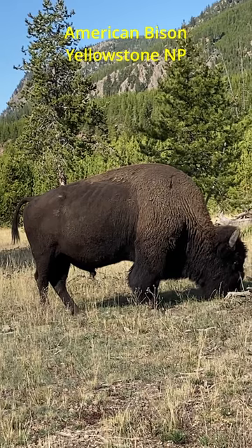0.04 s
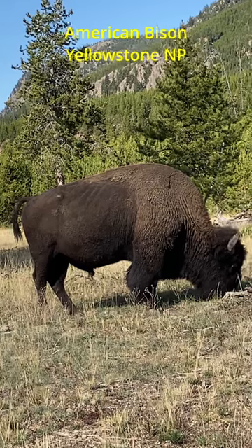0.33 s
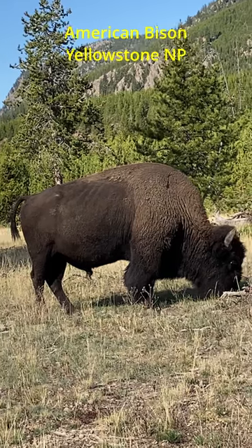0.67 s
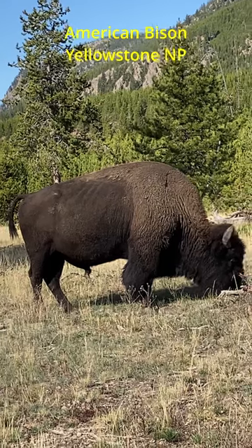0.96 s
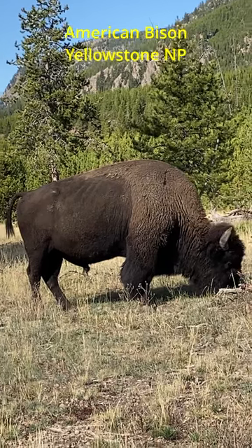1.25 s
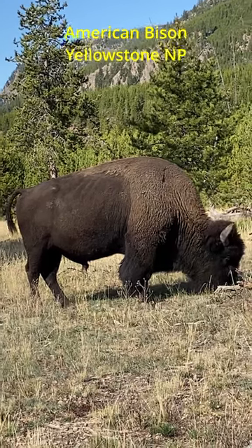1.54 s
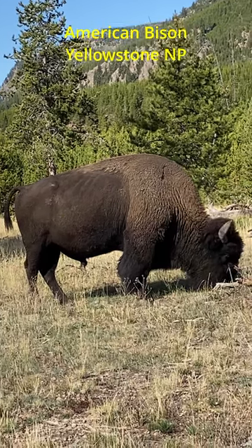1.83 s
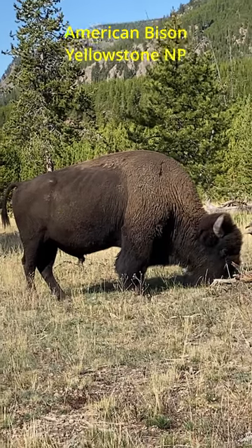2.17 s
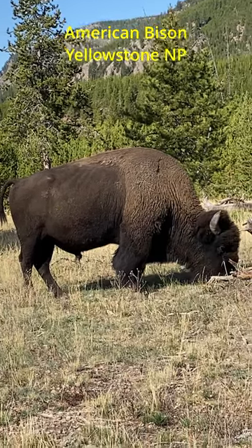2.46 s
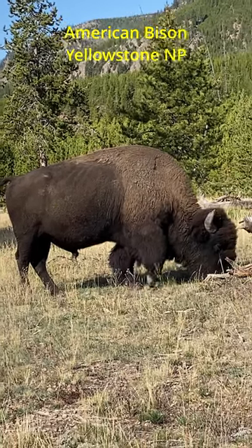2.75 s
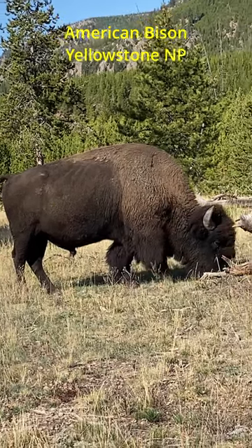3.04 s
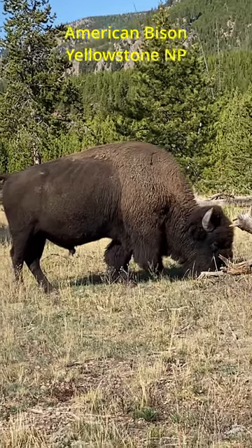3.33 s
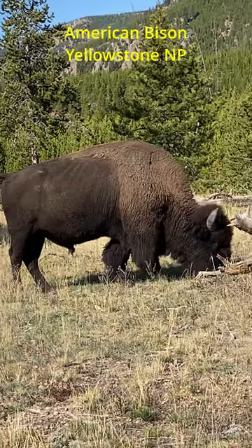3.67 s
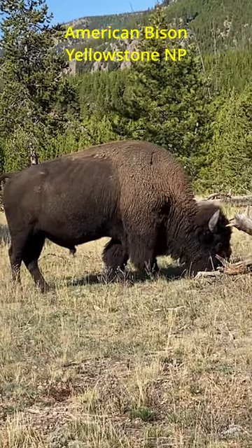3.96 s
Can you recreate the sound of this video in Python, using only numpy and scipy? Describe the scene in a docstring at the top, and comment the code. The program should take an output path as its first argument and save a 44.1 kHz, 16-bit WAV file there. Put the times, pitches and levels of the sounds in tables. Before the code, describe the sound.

A passing vehicle's low rumble and tyre roar carry across an open field over faint hiss. The tyres brighten slightly and fade, a deeper engine briefly swells near the end, and dry grass rustles faintly near the microphone.

```python
"""A vehicle passes out of sight beyond a dry meadow. From the start its engine drones over a low hum
that throbs as two tones beat; faint hiss hangs above, and a very faint, fast ticking, likely a camera's,
sounds close by. A few soft bumps of air strike the microphone, the first within the opening second.
The tyres' roar, broad noise with a gliding tread resonance, brightens a little and then recedes.
Near three seconds a deeper engine revs briefly, and the sparse rustles of dry grass come more often."""
import sys
import numpy as np
from scipy import signal
from scipy.fft import rfft, irfft
from scipy.io import wavfile

SR = 44100
rng = np.random.default_rng(int(sys.argv[2]) if len(sys.argv) > 2 else 0)


def digitize_waveform(pressure):
    """Quantize a signal to 16-bit integers and store it at the path in sys.argv[1].

    Rows of a 2-D input are taken as channels; values are limited to [-1, 1].
    """
    field = np.atleast_2d(pressure).T
    bounded = np.clip(field, -1, 1)
    quanta = np.round(bounded * 32767).astype(np.int16)
    wavfile.write(sys.argv[1], SR, quanta)


N = 176400
TIME = np.arange(N) / SR
FREQS = np.maximum(np.fft.rfftfreq(N, 1 / SR), 1)

# The exhaust's strongest tone. Each row: time in seconds, frequency in Hz, level in dB.
EXHAUST_TONE = [(0, 97, -65), (.39, 94.2, -51.5), (.65, 93.6, -52), (.76, 93.75, -49.5),
                (1.1, 93.34, -52.5), (1.3, 93.6, -54.5), (1.5, 93.8, -56.5), (1.78, 93.5, -52),
                (2.05, 93.8, -59.5), (2.47, 93.1, -53.5), (2.66, 94.14, -61.5), (3.3, 94.9, -59.5),
                (4, 94.8, -60)]
# Two upper drones. Each row: time in seconds, then frequency in Hz and level in dB
# for the lower drone, then the same for the upper.
ENGINE_DRONES = [(0, 160, -64.5, 275.9, -67.5), (.7, 162, -67, 277.8, -65.5),
                 (1.6, 158.5, -66.5, 282.9, -67.5), (2.4, 163, -65, 281, -69.5),
                 (2.9, 161.5, -62, 277.6, -71.5), (3.3, 158, -66, 278.7, -70), (4, 161, -63.5, 279.5, -70)]
# The rumble's spectrum. Each row: frequency in Hz, relative density in dB.
RUMBLE_SPECTRUM = [(10, -29.5), (20, -6), (45, 1.5), (70, -1.5), (95, 0.5), (125, 0), (200, -2.5),
                   (260, -6.5), (350, -8.5), (410, -22), (700, -18), (3000, -74)]
# The rumble's course. Each row: time in seconds, level in dB.
RUMBLE_LEVELS = [(0, -53.5), (.8, -53.5), (1.15, -54), (1.7, -56.5), (2.4, -54.5), (3, -55.5), (3.5, -55.5),
                 (4, -57.5)]
def engine():
    """Periodic firing gives a line spectrum: an exhaust tone and two drones stand over a noisy rumble."""
    hz, db = in_time(EXHAUST_TONE)
    lower_hz, lower_db, upper_hz, upper_db = in_time(ENGINE_DRONES)
    return (from_db(db) * tone(hz, waver=0.26)
            + from_db(lower_db) * tone(lower_hz, waver=0.48)
            + from_db(upper_db) * tone(upper_hz, waver=0.48)
            + wash(RUMBLE_SPECTRUM, in_time(RUMBLE_LEVELS)[0], flutter_db=0.66, flutter_hz=10))


# Faint hums of steady pitch. Each row: frequency in Hz, relative level in dB, waver depth from 0 to 1.
STEADY_HUMS = [(32.4, -69.5, 0), (41.3, -74, 0.9), (79.6, -66.5, 0.7)]
# The swell of all the hums together. Each row: time in seconds, gain in dB.
HUM_SWELL = [(0, -1.5), (.5, 1), (1, 3), (1.55, 0.5), (2.3, -1), (3, 1.5), (4, -2.5)]
THROB_HZ, THROB_DB, PARTNER_DB = 60, -58, -2.5
BEAT_HZ, IN_PHASE_S = 2.94, 0.175
def hums():
    """Beating: two close tones throb at their difference frequency, among fainter steady hums."""
    beat = 1 + from_db(PARTNER_DB) * np.exp(2j * np.pi * BEAT_HZ * (TIME - IN_PHASE_S))
    throb = from_db(THROB_DB) * np.real(signal.hilbert(tone(THROB_HZ, waver=0.25)) * beat)
    steady = sum(from_db(db) * tone(hz, waver) for hz, db, waver in STEADY_HUMS)
    return (throb + steady) * from_db(in_time(HUM_SWELL)[0])


# Road noise. Each row: time in seconds, relative levels in dB of the roar, its upper edge and its body.
ROAD_LEVELS = [(0.08, -50.5, -57.5, -58), (0.29, -52.5, -62, -60.5), (.8, -55, -60.5, -62.5),
               (1.12, -57, -59.5, -61.5), (1.6, -58, -59.5, -63.5), (1.97, -58.5, -61.5, -64.5),
               (2.12, -62, -57.5, -64.5), (2.25, -61, -63.5, -65.5), (2.33, -55, -62.5, -65.5),
               (2.48, -60, -63.5, -66.5), (2.87, -62, -65, -65.5), (3.44, -62, -66, -64),
               (3.55, -62.5, -63, -67), (3.89, -61.5, -68, -63.5), (4.0, -61, -65, -67)]
# The spectra of those three bands. Each row: frequency in Hz, relative density in dB.
ROAR_SPECTRUM = [(200, -46), (600, -23), (960, -8.5), (1020, 2), (1250, 8), (1450, -1.5), (1700, -8.5),
                 (2500, -41), (6000, -54)]
EDGE_SPECTRUM = [(500, -31), (1100, -21), (1400, 1.5), (1600, 2.5), (1950, -3), (2150, -9), (2600, -19.5),
                 (3500, -43), (8000, -67)]
BODY_SPECTRUM = [(60, -29), (200, -4), (400, -4.5), (550, -0.5), (750, 0), (930, 1.5), (1200, -18),
                 (2000, -57), (6000, -72)]
# The tread resonance. Each row: time in seconds, centre in Hz, gain in dB added to the roar's curve.
TREAD_RESONANCE = [(0, 1272, -4.5), (.45, 1250, -5.5), (1.1, 1251, -15.5), (1.6, 1426, -3),
                   (2.1, 1446, -3.5), (2.55, 1282, -11), (2.7, 1236, 2.5), (2.85, 1253, -1),
                   (3.07, 1255, -4.5), (3.15, 1290, -1), (3.22, 1260, -6.5), (4, 1217, -12)]
ROAR_TRIM_DB, EDGE_TRIM_DB, BODY_TRIM_DB, TREAD_TRIM_DB = -2, 1.5, 4, 1
def tyres():
    """Rolling contact radiates broadband noise, with a tread resonance that glides as the vehicle moves."""
    roar_db, edge_db, body_db = in_time(ROAD_LEVELS)
    hz, tread_db = in_time(TREAD_RESONANCE)
    band = port_noise(resonance(hz.mean(), width_hz=290) * ripple())
    glide = np.exp(2j * np.pi * np.cumsum(hz - hz.mean()) / SR)
    tread = np.real(signal.hilbert(band) * glide)  # shifts the whole band in frequency
    flutter_db = 0.74 * drift(19)
    return (tread * from_db(roar_db + tread_db + TREAD_TRIM_DB + flutter_db)
            + wash(ROAR_SPECTRUM, roar_db + ROAR_TRIM_DB, flutter_db=1.26, flutter_hz=19)
            + wash(EDGE_SPECTRUM, edge_db + EDGE_TRIM_DB, flutter_db=1.5, flutter_hz=34)
            + wash(BODY_SPECTRUM, body_db + BODY_TRIM_DB, flutter_db=0.57, flutter_hz=7.8))


ECHO_DELAY_S, ECHO_WANDER_S, ECHO_DB = 0.0054, 0.00044, -13.5
def shifting_reflection(direct):
    """Comb filtering: an echo whose path slowly wanders interferes with the direct sound."""
    emitted_s = TIME - ECHO_DELAY_S - ECHO_WANDER_S * drift(0.27)
    echo = np.array([np.interp(emitted_s, TIME, channel) for channel in direct])
    gain = from_db(ECHO_DB)
    return (direct + gain * echo) / np.hypot(1, gain)  # keeps the power the same


# Bands of tyre noise. Each row: centre in Hz, width in Hz, greatest level in dB,
# time of that level in seconds, spread in seconds.
WHINE_BANDS = [(1036, 83, -61.5, 1.26, 0.52), (1910, 370, -65.5, 1.55, 0.47)]
def tyre_whine():
    """Band-limited noise: a narrow whine and a brighter rush each swell once as the vehicle passes."""
    return sum(port_noise(resonance(hz, width_hz)) * from_db(db) * bell_curve(peak_s, spread_s)
               for hz, width_hz, db, peak_s, spread_s in WHINE_BANDS)


# The deeper engine's rev. Each row: time in seconds, firing rate in Hz, relative level in dB.
REV_COURSE = [(2.55, 40.87, -70), (2.72, 43.04, -56), (3.05, 45.16, -55), (3.35, 44.5, -65),
              (3.7, 40.99, -72)]
# Its harmonics. Each row: multiple of the firing rate, gain in dB.
REV_HARMONICS = [(1, -2.5), (2, -12.5), (3, -9.5)]
def revving_engine():
    """A harmonic series follows the firing rate, so the deep exhaust note rises and sinks as one."""
    hz, db = in_time(REV_COURSE)
    return sum(from_db(db + gain_db) * tone(order * hz, waver=0.2) for order, gain_db in REV_HARMONICS)


# The spectra of the hiss and the dry sizzle above it. Each row: frequency in Hz, relative density in dB.
HISS_SPECTRUM = [(500, -5.5), (2400, 8), (3000, 4), (4000, 2), (5000, 0.5), (6500, -2.5), (7600, -7.5),
                 (8600, -7.5), (9500, -8.5), (11000, -19.5), (13000, -28.5), (15500, -16)]
SIZZLE_SPECTRUM = [(3000, -29), (6000, 4), (7500, 5), (8400, 11.5), (9500, 4), (10500, 13), (11200, -18),
                   (15000, -46)]
def hiss():
    """Random amplitude modulation: fast and shallow, it leaves hiss smooth; slow and deep, it flickers."""
    return (wash(HISS_SPECTRUM, level_db=-66.5, flutter_db=1.38, flutter_hz=47)
            + wash(SIZZLE_SPECTRUM, level_db=-84, flutter_db=4, flutter_hz=4.8))


# Rustles of dry grass. Each row: start in seconds, level in dB, centre in Hz.
GRASS_RUSTLES = [(.64, -70, 3530), (1.779, -70, 3430), (2.826, -65.5, 3180), (2.859, -76, 4990),
                 (2.944, -64.5, 2600), (3.155, -65.5, 2585), (3.262, -66, 2790), (3.835, -67, 3287)]
def grass(attack_s=0.001, decay_s=0.022, edge_ratio=1.12):
    """Each rustle is a noise transient: a grainy band of treble that starts sharply and dies away."""
    crackle = port_noise(1) * from_db(1.6 * drift(300))
    out = 0
    for start_s, db, hz in GRASS_RUSTLES:
        age = np.maximum(TIME - start_s, 0)
        band = signal.butter(2, [hz / edge_ratio, hz * edge_ratio], "band", fs=SR, output="sos")
        envelope = np.minimum(age / attack_s, 1) * np.exp(-age / decay_s)
        out = out + from_db(db) * rms_one(signal.sosfilt(band, crackle)) * envelope
    return out


# Bumps of air. Each row: time in seconds, peak at the right port in dB, right minus left in dB.
AIR_BUMPS = [(.143, -54, 8), (.697, -51, 18), (0.818, -48, 22), (2.315, -54, 17), (2.479, -49, 8)]
def air_bumps(top_hz=447, spread_s=0.0078):
    """Local pressure pulses strike mainly the right microphone port and sound as soft, dull pops."""
    dull = signal.butter(2, [top_hz / 3, top_hz], "band", fs=SR, output="sos")
    out = np.zeros((2, N))
    for peak_s, db, left_drop_db in AIR_BUMPS:
        puff = rng.standard_normal(N) * bell_curve(peak_s, spread_s)
        pop = signal.sosfilt(dull, puff + 1e-18)
        out += pop / np.abs(pop).max() * from_db([[db - left_drop_db], [db]])
    return out


# The ticks' resonances. Each row: centre in Hz, width in Hz, level in dB,
# gains in dB of the third and the fourth tick in each round of four.
TICK_RESONANCES = [(5725, 91, -71.5, -1, -0.5), (8320, 860, -77.5, -7.5, -5), (9630, 1300, -81, -14, -8)]
TICKS_PER_S, FIRST_TICK_S, TICK_SCATTER_DB = 20.1, 0.015, 1.5
def ticking(attack_s=0.0049, decay_from_s=0.014, decay_s=0.013):
    """A periodic train of bursts sounds in three high resonances, accented in rounds of four."""
    cycles = (TIME - FIRST_TICK_S) * TICKS_PER_S
    tick = np.floor(cycles).astype(int)
    age = (cycles - tick) / TICKS_PER_S
    burst = np.minimum(age / attack_s, 1) * np.exp(-np.maximum(age - decay_from_s, 0) / decay_s)
    out = 0
    for hz, width_hz, db, third_db, fourth_db in TICK_RESONANCES:
        accent_db = np.array([0, 0, third_db, fourth_db])[tick % 4]
        scatter_db = TICK_SCATTER_DB * rng.standard_normal(N)[tick]
        out = out + port_noise(resonance(hz, width_hz)) * burst * from_db(db + accent_db + scatter_db)
    return out


def ripple(depth_db=1.8, decay_s=0.0097, full_from_hz=1000):
    """Interference of reflections from ground and trees ripples the spectrum, less so in the bass."""
    echoes = rng.standard_normal(N) * np.exp(-TIME / decay_s)
    pattern = rms_one(np.real(rfft(echoes)))
    return from_db(depth_db * np.minimum(FREQS / full_from_hz, 1) * pattern)


# Likeness of the two microphone ports. Each row: frequency in Hz, coherence from 0 to 1.
PORT_COHERENCE = [(30, 0.54), (70, 1), (150, 1), (270, 0.98), (400, 0.88), (550, 0.45), (900, 0.61),
                  (1300, 0.93), (1650, 0.91), (2200, 0.7), (2900, 0.39), (3600, 0.86), (4300, 0.41),
                  (5200, 0.97), (5800, 0.98), (6500, 1), (8500, 1), (14000, 0.81)]
# Their phase difference. Each row: frequency in Hz, lead of the left port in radians.
PORT_PHASE = [(100, 0.5), (300, -0.38), (690, -0.07), (1400, 0.3), (2000, 1.57), (2400, 2), (3200, 2),
              (4100, 1.5), (5000, 3.5), (5400, 3), (5800, 3.5), (6800, 4.5), (8400, 7.5), (11500, 2),
              (15000, 10)]
# Their level difference. Each row: frequency in Hz, left minus right in dB.
PORT_BALANCE = [(100, 0), (300, -0.5), (600, -0.7), (1200, 1.5), (2000, -3), (4000, 0)]
def port_noise(gain):
    """Partial coherence: coloured noise reaches two ports partly alike, offset in phase and level."""
    mid, side = rfft(rng.standard_normal((2, N)))
    coherence = np.clip(over_hz(PORT_COHERENCE), 0, 1)
    sign = np.array([[1], [-1]])  # left, right
    pair = np.sqrt(1 + coherence) * mid + sign * np.sqrt(1 - coherence) * side
    phase = np.exp(.5j * sign * over_hz(PORT_PHASE))
    balance = from_db(sign * over_hz(PORT_BALANCE) / 2)
    return rms_one(irfft(pair * phase * balance * gain, N))


def wash(spectrum, level_db, flutter_db, flutter_hz):
    """Moving air modulates the level of a noise with the given spectrum."""
    noise = port_noise(from_db(over_hz(spectrum)) * ripple())
    return noise * from_db(level_db + flutter_db * drift(flutter_hz))


def tone(hz, waver, waver_hz=2.8):
    """Narrowband modulation: a sine of unit rms wavers in level and phase."""
    swing = 1 + waver * (drift(waver_hz) + 1j * drift(waver_hz))
    turns = np.cumsum(hz * np.ones(N)) / SR + rng.random()
    return rms_one(np.real(swing * np.exp(2j * np.pi * turns)))


def resonance(hz, width_hz):
    """Gain of two like resonators in cascade; the width lies between the half-amplitude points."""
    return 1 / (1 + ((FREQS ** 2 - hz ** 2) / (FREQS * width_hz)) ** 2)


def drift(corner_hz):
    """Low-passed noise gives a random fluctuation of unit rms."""
    return rms_one(irfft(rfft(rng.standard_normal(N)) / (1 + (FREQS / corner_hz) ** 2), N))


def bell_curve(peak_s, spread_s):
    """A Gaussian envelope in time."""
    return np.exp(-.5 * ((TIME - peak_s) / spread_s) ** 2)


def in_time(rows):
    """Linear interpolation of each column to every sample."""
    seconds, *columns = np.transpose(rows)
    return [np.interp(TIME, seconds, column) for column in columns]


def over_hz(points):
    """Interpolation of a table along a logarithmic frequency axis."""
    hz, value = np.transpose(points)
    return np.interp(np.log(FREQS), np.log(hz), value)


def from_db(db):
    """Decibels to amplitude ratio."""
    return 10 ** (np.asarray(db) / 20)


def rms_one(x):
    """Normalisation to unit rms."""
    return x / np.sqrt(np.mean(np.abs(x) ** 2) + 1e-20)


def scene():
    """Superposition: the vehicles, hiss and grass add to the small sounds at the microphone."""
    vehicles = engine() + hums() + revving_engine() + shifting_reflection(tyres()) + tyre_whine()
    return vehicles + hiss() + grass() + ticking() + air_bumps()


def record(dry):
    """Band limiting: after a quick fade-in, a steep low-pass filter removes the highest treble."""
    start_s, fade_s, stopband_hz = 0.035, 0.041, 16200
    fade = np.clip((TIME - start_s) / fade_s, .002, 1)
    low_pass = signal.cheby2(16, 60, stopband_hz, fs=SR, output="sos")
    return signal.sosfilt(low_pass, dry * fade)


dry = scene()
out = record(dry)
digitize_waveform(out)
```